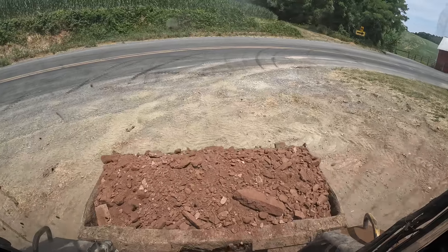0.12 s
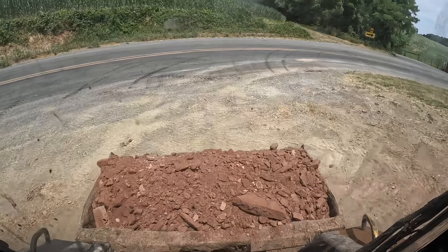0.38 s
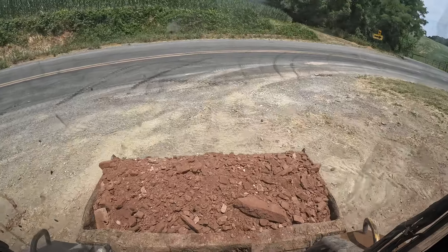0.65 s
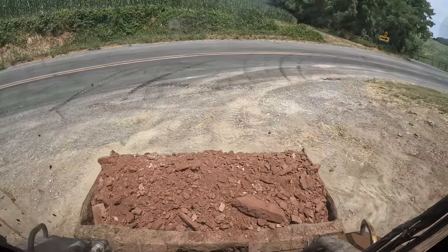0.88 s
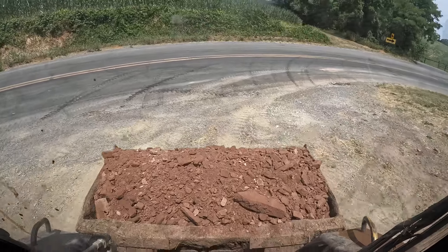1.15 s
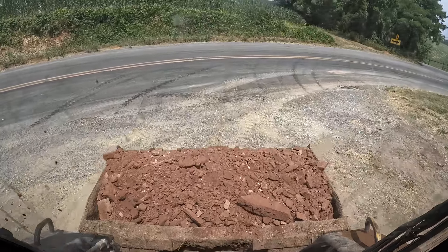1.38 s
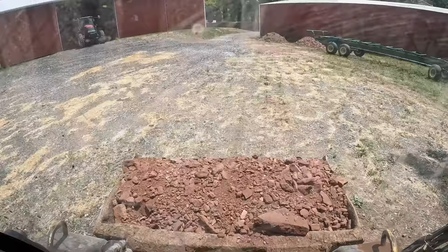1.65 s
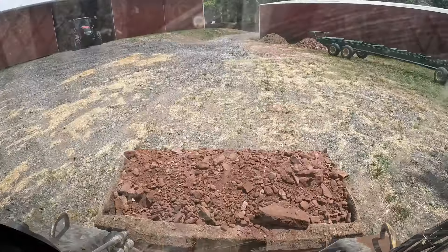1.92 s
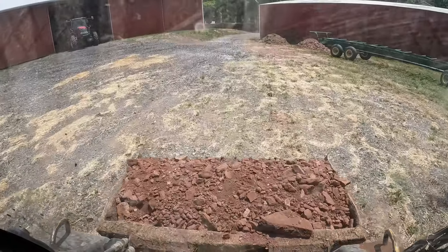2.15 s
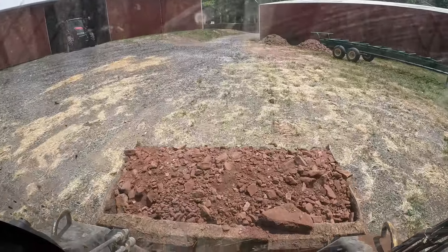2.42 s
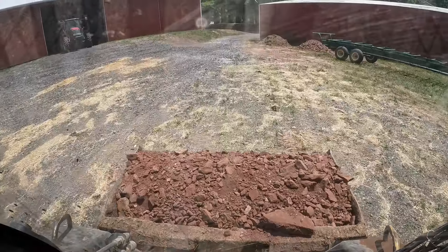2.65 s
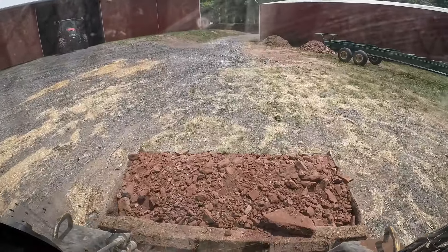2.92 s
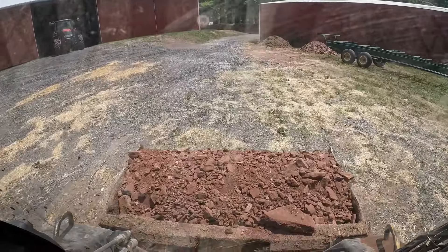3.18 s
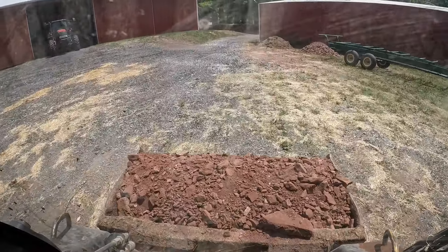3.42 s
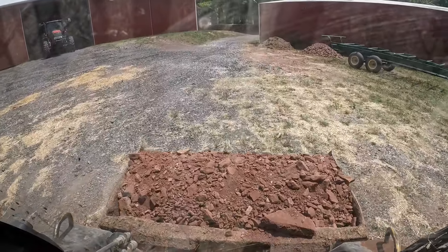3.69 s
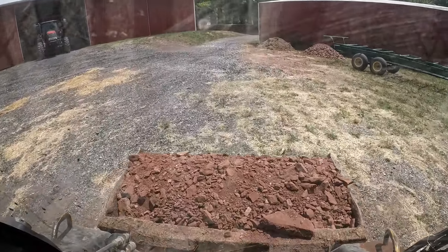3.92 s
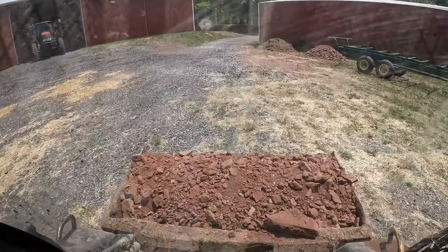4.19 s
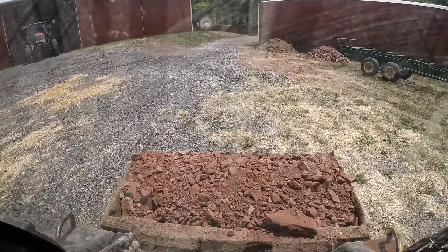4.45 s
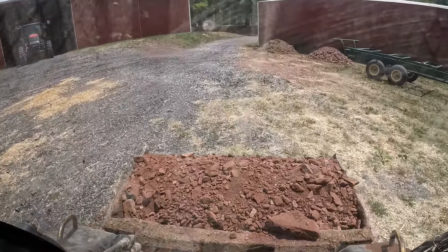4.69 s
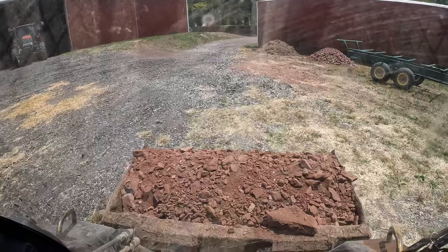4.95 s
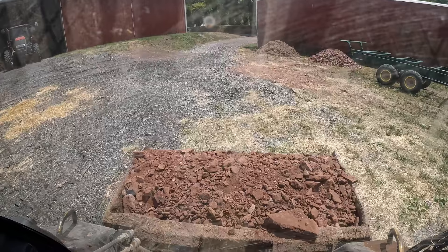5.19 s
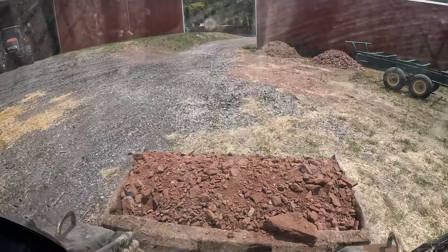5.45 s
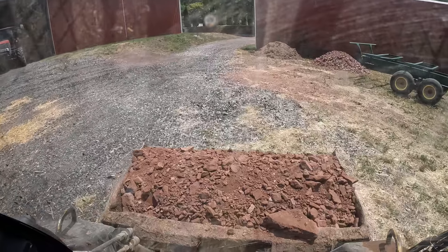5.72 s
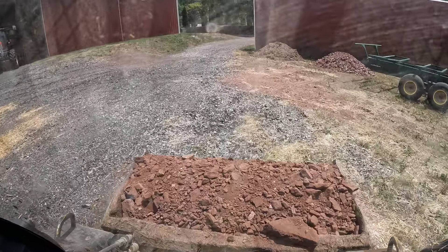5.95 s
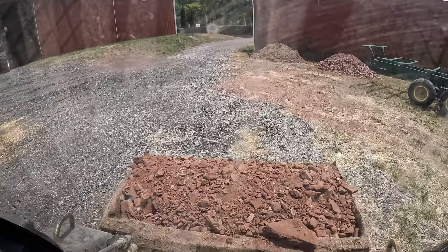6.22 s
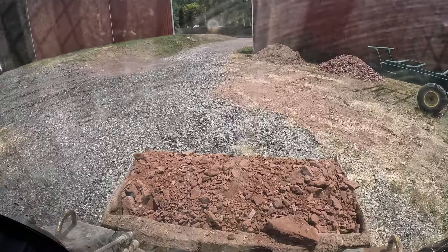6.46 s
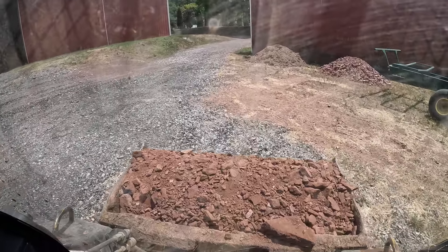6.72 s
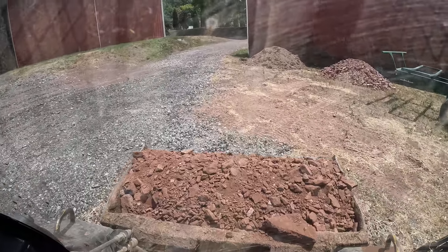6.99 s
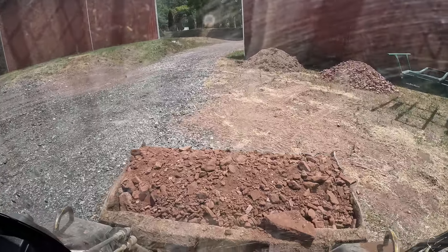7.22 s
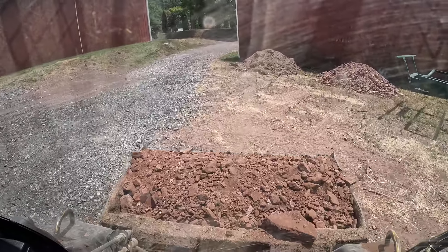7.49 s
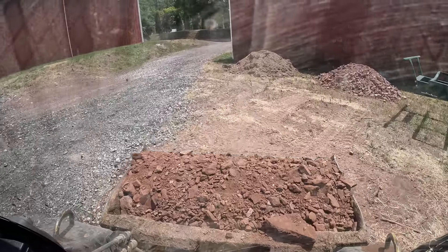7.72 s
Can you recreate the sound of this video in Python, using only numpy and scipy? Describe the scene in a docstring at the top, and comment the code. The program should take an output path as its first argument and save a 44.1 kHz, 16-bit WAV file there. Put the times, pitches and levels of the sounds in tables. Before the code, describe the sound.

Inside a small loader's closed cab, a booming diesel and whining pump drone as loose steel rattles, with one abrupt cut to brief silence.

```python
"""A booming diesel note and a whining pump fill the closed cab of a small loader crossing a yard with stone.
The microphone sits inside with the driver: panels roar, the frame groans, loose steel rattles over bumps.
Engine and pump are sine orders of one shaft; the rest is noise shaped by resonances, steady or in bursts.
A stereo passage is cut dead with a bright click; after a short silence a mono passage fades in."""
import sys
import numpy as np
from scipy import signal
from scipy.fft import rfft, irfft, next_fast_len
from scipy.io import wavfile
from scipy.ndimage import uniform_filter1d, map_coordinates

SR = 44100
rng = np.random.default_rng(int(sys.argv[2]) if len(sys.argv) > 2 else 0)


def amplitude_ratio(level_db):
    """Convert a level in decibels to the matching linear amplitude (field) ratio."""
    exponent = np.asarray(level_db, float) / 20
    return 10 ** exponent


def materialize(psi):
    """Save the field psi as 16-bit PCM at rate SR to the path in sys.argv[1].

    A 1-D psi becomes a single channel; in a 2-D psi each row is a channel.
    """
    bounded = np.clip(np.atleast_2d(psi).T, -1, 1)
    quanta = np.round(bounded * 32767).astype(np.int16)
    wavfile.write(sys.argv[1], SR, quanta)


N = 346626  # samples
CUT_S = 1.528  # the first passage ends


def unit(x):
    """Scale to rms 1."""
    return x / np.sqrt(np.mean(x ** 2) + 1e-20)


def along(points, hz):
    """Read (Hz, value) points on a log frequency axis."""
    f, v = np.transpose(points)
    return np.interp(np.log(hz + 1), np.log(f + 1), v)


def curves(rows):
    """One value per sample for each column after the time."""
    s, *cols = np.transpose(rows)
    return np.array([np.interp(np.arange(N) / SR, s, c) for c in cols])


def wobble(rate):
    """A smooth random curve with rate knots a second."""
    knots = rng.standard_normal(int(N * rate / SR) + 4)
    return map_coordinates(knots, [np.arange(N) * rate / SR])


def filtered(x, response):
    """Multiply the spectrum of x by a response of frequency."""
    m = 2 * next_fast_len(x.shape[-1] // 2 + 4096)
    return irfft(rfft(x, m) * response(np.fft.rfftfreq(m, 1 / SR)), m)[..., :x.shape[-1]]


def peaks(modes, hz, extra_db=0):
    """Gain of resonances standing on a flat background."""
    centre, width, db = np.transpose(modes)[..., None]
    bells = amplitude_ratio(db + extra_db) ** 2 / (1 + (2 * (hz - centre) / width) ** 2)
    return np.sqrt(1 + np.sum(bells, axis=0))


def causal(gain):
    """The same gain, in minimum phase so that all ringing follows the blow."""
    cepstrum = irfft(np.log(gain + 1e-6))
    half = len(cepstrum) // 2
    cepstrum[1:half] *= 2
    cepstrum[half + 1:] = 0
    return np.exp(rfft(cepstrum))


# spectrum of the ride rumble: freq_hz, density_db (relative, per Hz)
RUMBLE_SPECTRUM = [(7.1, -44), (12, -14), (16, -7), (22, -2), (43, -6.5), (51, -7.5), (58, -11.5),
                   (75, -28.5), (130, -120)]


def ride_rumble():
    """Low noise of the machine riding over the ground."""
    return unit(filtered(rng.standard_normal(N), lambda hz: amplitude_ratio(along(RUMBLE_SPECTRUM, hz))))


# spectrum of the panel roar: freq_hz, density_db (relative, per Hz)
ROAR_SPECTRUM = [(47, -28.5), (80, -9.5), (119, -13.5), (200, -12.5), (262, -16), (290, -22.5), (330, -19),
                 (420, -22.5), (600, -26), (780, -55), (1320, -120)]
# resonances of cab panels and air: freq_hz, width_hz, level_db (over the noise around them)
CAB_MODES = [(165, 25, 1.5), (230.7, 17, 12), (371, 31, 6.5), (504, 14, 5.5), (700, 57, -4.5),
             (800, 33, 0.5), (916, 80, 0)]


def panel_roar(shake):
    """Shaken noise rings the resonances of the cab's panels and air."""
    noise = rng.standard_normal(N) * shake
    return unit(filtered(noise, lambda hz: amplitude_ratio(along(ROAR_SPECTRUM, hz)) * peaks(CAB_MODES, hz)))


# spectrum of the engine bay drone: freq_hz, density_db (relative, per Hz)
DRONE_SPECTRUM = [(330, -21.5), (560, -7.5), (630, -4.5), (684, -5), (908, -7.5), (1800, -27.5),
                  (2340, -51), (3960, -120)]


def bay_drone(shake):
    """Engine bay noise, shaken like the panels, reaches the ear through the same cab resonances."""
    noise = rng.standard_normal(N) * shake
    return unit(filtered(noise, lambda hz: amplitude_ratio(along(DRONE_SPECTRUM, hz)) * peaks(CAB_MODES, hz)))


# spectrum of valves and injectors: freq_hz, density_db (relative, per Hz)
CLATTER_SPECTRUM = [(760, -31.5), (1300, -2.5), (1490, -1.5), (1610, -9), (1980, -9), (3120, -10.5),
                    (4660, -24), (6610, -28.5), (10600, -39.5), (13500, -53.5), (15200, -77)]
# resonances of loose steel, each use shifts the levels: freq_hz, width_hz, level_db (over the noise)
STEEL_MODES = [(1250, 170, -3), (1900, 45, 1), (2105, 35, 3), (2415, 35, 2), (2750, 40, 1), (2880, 40, 2),
               (3060, 40, 0), (3370, 40, 2), (3580, 45, 2), (3880, 50, 0), (4300, 50, 2), (5850, 120, 3),
               (6860, 70, -3), (7780, 60, 3), (10500, 200, 3), (12460, 60, 5)]


def valve_clatter(kick, jolt):
    """Uneven valve and injector noise, pulsed by the firing, faintly rings the steel."""
    uneven_db = .3 * kick + 1.3 * jolt + 1.3 * wobble(16) + 1.2 * wobble(120)
    ticks = rng.standard_normal(N) * amplitude_ratio(uneven_db)
    return unit(filtered(ticks, lambda hz: amplitude_ratio(along(CLATTER_SPECTRUM, hz)) * peaks(STEEL_MODES, hz, -7)))


# levels of the ride, rumble wobbling about its own: time_s, rumble_db, roar_db, clatter_db (rms)
RIDE_LEVELS = [(0.0, -24.5, -19.5, -41.5), (0.3, -20, -20, -41), (0.85, -31, -21, -40.5),
               (1.1, -22, -22.5, -42.5), (1.53, -26, -18.5, -43.5), (1.6, -27, -24, -49),
               (2.4, -26, -25, -47), (2.7, -30, -22, -50), (3.3, -24, -19.5, -45.5), (3.9, -23, -20, -45),
               (4.44, -24.5, -20, -48.5), (4.75, -27, -20, -47), (5.3, -21, -19.5, -44.5),
               (5.8, -26, -19, -45), (6.6, -24.5, -20, -48), (7.0, -23, -19.5, -49),
               (7.4, -24, -19.5, -46.5), (7.86, -23.5, -17.5, -46.5)]


def body(turns):
    """Ride rumble, panels and engine bay kicked by every firing, and valve and injector clatter."""
    rumble_db, roar_db, clatter_db = curves(RIDE_LEVELS)
    rumble_db = rumble_db + 2.7 * wobble(4.5)  # uneven ground
    in_first = np.arange(N) < CUT_S * SR
    drone_db = roar_db + np.where(in_first, -7.5, -11)  # drone under the roar in each passage
    kick = np.cos(2 * np.pi * turns)
    jolt = wobble(45)
    shake = amplitude_ratio(0.6 * kick + 0.61 * jolt)
    out = amplitude_ratio(rumble_db) * ride_rumble() + amplitude_ratio(roar_db) * panel_roar(shake)
    return out + amplitude_ratio(drone_db) * bay_drone(shake) + amplitude_ratio(clatter_db) * valve_clatter(kick, jolt)


# frame groans after bumps: centre_s, level_db (rms before the swell), freq_hz, width_hz, half_length_s
FRAME_GROANS = [(.27, -20.5, 103, 37, 0.11), (0.956, -38, 1390, 400, 0.018), (2.0, -33, 493, 55, 0.042),
                (2.68, -31, 790, 95, 0.2), (3.152, -33.5, 769.7, 110, 0.17), (3.38, -34, 780, 110, .12),
                (3.62, -30, 800, 120, 0.058), (4.566, -29, 1140, 800, 0.031), (5.38, -34, 830, 59.5, 0.067),
                (5.897, -32, 756.8, 218, 0.081)]


def groans():
    """A bump loads the frame: a band of noise swells and dies around one of its resonances."""
    out = np.zeros(N + SR)
    t = np.arange(SR // 2) / SR - .25
    for s, db, hz, width, half in FRAME_GROANS:
        noise = rng.standard_normal(len(t))
        band = filtered(noise, lambda f: 1 / (1 + (2 * (f - hz) / width) ** 2))
        swell_db = -14 * (t / half) ** 2
        out[round(s * SR):][:len(t)] += amplitude_ratio(db + swell_db) * unit(band)
    return out[SR // 4:][:N]


def burst_swell(t, length):
    """Level in dB of a burst that swells to its peak and dies away."""
    rise_share = .42  # of the length
    return np.where(t < 0, -8 * (t / rise_share / length) ** 2, -7 * t / (1 - rise_share) / length)


def clank_blow(t, hold):
    """Level in dB of a sharp blow: quick attack, slight sag over the hold, steep fade."""
    attack_share, sag_db, fade_db_per_s = .3, 3, 900  # attack as a share of the hold
    attack = -8 * (t / attack_share / hold) ** 2
    fall = -sag_db * np.minimum(t / hold, 1) - fade_db_per_s * np.maximum(t - hold, 0)
    return np.where(t < 0, attack, fall)


def faint_rattles():
    """Chance rattles, three a second, in rows like those of the listed bursts."""
    count = int(3 * N / SR)
    # level_db, bright_db, length_s, ring_hz
    mean, spread = (-49, -22, .022, 2900), (2.5, 4, .006, 500)
    scatter = np.clip(rng.standard_normal((count, 4)), -2, 2)
    return np.c_[rng.random(count) * N / SR, mean + spread * scatter]


# swelling bursts: mostly rattles of loose steel; at 1.525 s a brief bright click where the first
# passage is cut; at 2.68, 5.508, 5.891 and 5.904 s flashes of trim buzz while the pump whines:
# peak_s, level_db (rms of the ringing noise before the swell),
# bright_db (each 2 dB tilts 1 dB an octave; -12 is neutral), length_s, ring_hz (loudest ring)
SWELLING_BURSTS = [(0.089, -36, -18, 0.058, 5400), (0.106, -36, -11.5, .022, 6640),
                   (0.161, -25.5, -21.5, 0.019, 7000), (0.249, -44, 2, 0.014, 7460),
                   (0.397, -37, -14.5, 0.029, 3520), (0.442, -36.5, -16, 0.03, 3660),
                   (0.481, -37.5, -14.5, 0.028, 2750), (0.566, -48, -10.5, .008, 6000),
                   (0.592, -34, -13.5, .027, 3190), (0.694, -36.5, -15.5, 0.062, 2810),
                   (0.768, -25.5, -23.5, 0.014, 3570), (0.82, -34, -16, .017, 4600),
                   (0.869, -39, -16, 0.019, 3640), (0.905, -35.5, -20, 0.028, 2580),
                   (1.12, -37, -18, 0.02, 2567), (1.151, -31.5, -21, .04, 4070),
                   (1.2, -33, -19, 0.039, 5700), (1.241, -36, -15, .014, 3900),
                   (1.258, -35, -11, 0.02, 2680), (1.302, -40, -11.5, 0.034, 5940),
                   (1.421, -52, -1, .06, 3280), (1.525, -26.5, -2, 0.0063, 4300),
                   (1.829, -38, -16, 0.027, 2170), (2.104, -33, -18.5, 0.035, 3610),
                   (2.142, -38.5, -11.5, 0.048, 2840), (2.202, -35.5, -26, .034, 4590),
                   (2.306, -46.5, -9.5, 0.016, 2385), (2.42, -44, -18, .025, 2820),
                   (2.465, -39, -16, 0.023, 2105), (2.508, -39, -20.5, 0.034, 5630),
                   (2.592, -40.5, -18.5, 0.029, 3340), (2.68, -41.5, -18.5, 0.13, 3380),
                   (2.968, -48, -11.5, 0.026, 2160), (3.233, -38, -19.5, 0.04, 3870),
                   (3.509, -34.5, -13.5, 0.035, 2800), (3.637, -34, -17.5, 0.03, 2350),
                   (3.69, -30, -25.5, 0.042, 2510), (3.986, -45, -21.5, 0.035, 3080),
                   (4.021, -42, -21, 0.035, 2518), (4.07, -33, -20, 0.046, 4150),
                   (4.155, -34.5, -22.5, 0.03, 3580), (4.32, -40.5, -20.5, 0.033, 2940),
                   (4.53, -32, -23.5, 0.11, 3270), (4.554, -39, -12, .012, 3500),
                   (4.565, -26, -9.5, .02, 7780), (4.569, -43.5, 1, .03, 12460),
                   (4.596, -32.5, -19, 0.024, 2850), (4.603, -38, -13.5, 0.01, 10700),
                   (4.76, -45.5, -12, 0.026, 4200), (4.931, -37, -16, .025, 4600),
                   (5.066, -33.5, -19.5, 0.053, 2000), (5.161, -37.5, -28, .019, 2594),
                   (5.218, -32.5, -27, 0.045, 3360), (5.221, -41, -32.5, 0.034, 2230),
                   (5.46, -34, -23, 0.014, 3430), (5.502, -36, -21, 0.052, 3120),
                   (5.508, -44, -11, 0.021, 5850), (5.745, -30, -20.5, 0.041, 2332),
                   (5.765, -34.5, -14, 0.02, 2070), (5.871, -38, -22, 0.021, 3330),
                   (5.891, -46.5, -14.5, .04, 6620), (5.904, -49.5, -6.5, 0.027, 7600),
                   (5.913, -36.5, -23.5, 0.05, 3360), (6.051, -31.5, -18.5, .019, 2940),
                   (6.128, -35.5, -18, 0.013, 2710), (6.168, -35.5, -24, 0.021, 3460),
                   (6.325, -40, -18, 0.024, 2900), (6.495, -44, -8, .014, 2400),
                   (6.527, -39, -17, 0.025, 3300), (6.582, -41, -19, 0.022, 3300),
                   (7.069, -46, -30, .035, 3400), (7.313, -42, -22, 0.02, 4000),
                   (7.468, -41, -11, 0.041, 2990), (7.524, -34, -21.5, 0.023, 3000),
                   (7.782, -36, -15, 0.022, 2800), (7.836, -42, -22, .014, 2700)]
# blows of steel on steel: attack_end_s, level_db, bright_db, hold_s, ring_hz (levels as for the bursts)
STEEL_CLANKS = [(0.318, -38.5, -9, 0.0088, 3020), (0.333, -27, -8, 0.005, 3100),
                (0.339, -27.5, -8.5, 0.006, 5920), (0.42, -30, -11, .007, 2840),
                (0.939, -44, -13, 0.0056, 2680), (0.952, -25.5, -10, .013, 3886),
                (1.043, -37, -12, 0.012, 3508), (1.077, -29.5, -22.5, .008, 3540),
                (2.071, -33, -19, .022, 3220), (3.163, -36.5, -12, 0.021, 3100),
                (3.213, -35.5, -16, 0.0071, 2900), (3.609, -30, -14.5, 0.017, 3100),
                (4.569, -24, -14, 0.012, 2600), (5.039, -31, -22, 0.012, 2260)]
# spectrum of a burst before its brightness tilt: freq_hz, density_db (relative, per Hz)
BURST_SPECTRUM = [(410, -27.5), (700, -0.5), (1350, -8.5), (1680, -12), (2850, -10.5), (4530, -14.5),
                  (5870, -20.5), (6760, -20), (7790, -24.5), (12900, -38.5), (15200, -53)]


def rattles_clanks_and_flashes():
    """Rattles, clanks, buzz flashes and the cut's click: rough noise bursts through random steel mode strengths."""
    size, lead = 8192, 2048  # samples: whole burst, part before the peak
    out = np.zeros(N + size + lead)
    t = (np.arange(size) - lead) / SR
    bursts = [(row, burst_swell) for row in list(SWELLING_BURSTS) + list(faint_rattles())]
    bursts += [(row, clank_blow) for row in STEEL_CLANKS]
    for (s, db, bright_db, length, ring_hz), shape in bursts:
        rough_db = 2.8 * np.repeat(rng.standard_normal(size // 48 + 1), 48)[:size]
        rough = rng.standard_normal(size) * amplitude_ratio(rough_db)
        strengths_db = rng.normal(-.5, 4, (len(STEEL_MODES), 1))

        def colour(hz):
            octaves = np.log2(np.minimum(hz, 9000) / 3000 + 0.039)
            slope_db = along(BURST_SPECTRUM, hz) + .5 * (bright_db + 12.0) * octaves
            loudest = peaks([(ring_hz, 260, 7.5)], hz)
            return causal(amplitude_ratio(slope_db) * peaks(STEEL_MODES, hz, strengths_db) * loudest)

        shaped = amplitude_ratio(shape(t, length)) * rough
        steady, ring = filtered(np.array([rough, shaped]), colour)
        out[round(s * SR):][:size] += amplitude_ratio(db) * ring / np.std(steady)
    return out[lead:][:N]


# resonances of trim shaken by the pump: freq_hz, width_hz, level_db (over the noise)
TRIM_MODES = [(3370, 45, 25), (3600, 60, 18), (2850, 350, 16), (5850, 150, 7), (6600, 100, 8),
              (7620, 90, 9)]


def buzz(whine_db):
    """Loose trim chatters with the pump whine, fading faster than the whine does."""
    chatter = rng.standard_normal(N) * amplitude_ratio(4.5 * wobble(12))

    def response(hz):
        treble_cut = 1 + (hz / 6000) ** 4
        bass_cut = 1 + (2000 / (hz + 1)) ** 6
        return peaks(TRIM_MODES, hz) / treble_cut / bass_cut

    return amplitude_ratio(-53 + 1.3 * (whine_db + 25)) * unit(filtered(chatter, response))


# load drags the engine down and raises the pump's whine:
# time_s, firing_hz (before flywheel smoothing), whine_db (before floor, trim and wobble)
ENGINE_LOAD = [(0.0, 67.4, -19.5), (0.12, 68.7, -22.5), (0.3, 70.7, -27), (0.48, 71.2, -30),
               (0.7, 72.12, -35), (1.0, 73.06, -32.5), (1.12, 72.8, -46), (1.52, 72.78, -37),
               (2.52, 71.94, -44), (2.6, 71.4, -31.5), (2.74, 68.47, -26.5), (2.9, 68.17, -22.5),
               (3.1, 69.22, -28.5), (3.4, 68.4, -22.5), (3.6, 69.1, -26), (3.72, 70.4, -31.5),
               (3.97, 71.23, -37.5), (4.08, 69.42, -31), (4.42, 70.78, -33), (4.6, 69, -27.5),
               (4.8, 69.95, -37), (5.02, 70.26, -34.5), (5.18, 68.54, -23.5), (5.4, 68.4, -24.5),
               (5.55, 69.75, -33.5), (5.74, 69.98, -33.5), (5.9, 68.3, -21), (6.03, 68.36, -27),
               (6.2, 70.33, -36), (6.4, 70.93, -34), (6.8, 69.73, -32), (7.15, 71.03, -36),
               (7.4, 69.37, -29.5), (7.5, 68.4, -36), (7.62, 68.3, -29.5), (7.86, 67.94, -24.5)]
# firing note, before its wobble: time_s, level_db (rms)
NOTE_LEVEL = [(0, -16.5), (0.4, -16.5), (0.9, -14.5), (1.52, -16), (1.9, -20.5), (2.4, -19), (3.0, -17),
              (4.0, -16), (5.3, -16.5), (6.3, -16), (7.3, -16.5), (7.55, -19.5), (7.86, -15.5)]
# pump fundamental, before its wobble: time_s, level_db (rms)
PUMP_LEVEL = [(0, -40.5), (0.5, -40), (1.52, -45.5), (2.2, -46.5), (2.7, -37.5), (3.5, -35.5), (3.9, -39.5),
              (4.3, -35), (4.9, -30.5), (5.2, -34), (5.6, -37.5), (6.0, -30.5), (6.45, -33.5),
              (6.75, -29.5), (7.2, -28.5), (7.4, -25.5), (7.5, -22.5), (7.86, -24.5)]
# other shaft orders; 6.5 and 13 are a 13-tooth gear pump, 3.67 and 4.75 belt-driven parts:
# multiple (of the firing rate), level_db (against the firing note, before wobble)
SHAFT_ORDERS = [(.5, -21), (1.25, -22), (1.75, -25), (2, -23), (2.5, -23), (3, -19), (3.67, -17), (4, -25),
                (4.75, -23), (5, -30), (6.5, -26), (7.24, -30), (8, -32), (10, -29), (11, -32), (13, -29.5)]


def engine():
    """Firing note and orders, and the nine-piston pump on the same shaft; also the turn count of the firing."""
    (firing_hz, whine_db), (note_db,), (pump_db,) = curves(ENGINE_LOAD), curves(NOTE_LEVEL), curves(PUMP_LEVEL)
    firing_hz = uniform_filter1d(firing_hz, size=SR // 16)  # the flywheel rounds every change
    whine_db = np.maximum(whine_db, -41)  # the whine's floor
    note_db = note_db + 1.37 * wobble(9)
    turns = np.cumsum(firing_hz) / SR
    flutter = wobble(25)  # the shaft never turns quite evenly

    def tone(k, db):
        phase = k * turns + rng.random() + 0.0065 * k * flutter
        return np.sqrt(2) * amplitude_ratio(db) * np.sin(2 * np.pi * phase)

    note = tone(1, note_db + 0.14 * wobble(26))
    orders = sum(tone(k, note_db + db + 2.0 * wobble(5)) for k, db in SHAFT_ORDERS)
    # two firings a shaft turn: the pump beats at pistons / 2 times the firing rate
    pistons = 9
    pump = tone(pistons / 2, pump_db + 1.1 * wobble(8))
    # the whine is the pump's second harmonic
    pump += tone(pistons, whine_db - 1.5 + 2.2 * wobble(12)) * (1 + .2 * wobble(70))
    pump += tone(3 * pistons / 2, whine_db - 23 + 1.7 * wobble(15))
    pump += tone(2 * pistons, 1.5 * (pump_db + 20.0) - 39.5 + 2.2 * wobble(16))
    pump += tone(4 * pistons, note_db - 48 + 4 * wobble(7))  # a thin strand comes and goes
    return note + orders + pump + buzz(whine_db), turns


# scattered sound between the ports, before a further 0.5 dB cut: freq_hz, side_db (against mid)
SIDE_WIDTH = [(60, -52.5), (130, -36.5), (290, -21.5), (640, -13.5), (1390, -4), (3060, -3.5), (6730, -3),
              (14800, -4)]
# balance of the ports: freq_hz, left_over_right_db
PORT_TILT = [(200, 0), (500, -1), (2400, -2), (4400, -1), (12000, -2)]


def scene():
    """The two microphone ports differ by scattered reflections off the cab's walls, mostly in the treble."""
    tones, turns = engine()
    mid = body(turns) + groans() + rattles_clanks_and_flashes() + tones
    z = signal.stft(mid, nperseg=512)[2]
    random_phase = np.exp(2j * np.pi * rng.random(z.shape))
    scattered = signal.istft(z * random_phase, nperseg=512)[1][:N]
    side = filtered(scattered, lambda hz: amplitude_ratio(along(SIDE_WIDTH, hz) - 0.5))
    lean = filtered(mid, lambda hz: amplitude_ratio(along(PORT_TILT, hz) / 2) - 1)
    return np.array([mid + side + lean, mid - side - lean])


def roll_off(x):
    """The treble ends steeply here."""
    return signal.sosfilt(signal.butter(12, 15370, fs=SR, output="sos"), x)


def record(dry):
    """Gain control evens out the surges and the input stage rounds the peaks.
    The first passage stops within a few ms; the second is mono and fades in."""
    power = np.abs(uniform_filter1d(np.mean(dry ** 2, axis=0), size=2600))
    usual = np.abs(uniform_filter1d(power, size=22000))
    evened = dry * (usual / (power + 1e-9)) ** 0.21
    top = .9  # full swing of the input stage
    rounded = evened / (1 + np.abs(evened / top) ** 4) ** (1 / 4)
    t = np.arange(N) / SR
    first = np.clip((CUT_S - t) / .004, 0, 1)
    fade_start_s, fade_s, fade_power = 1.615, .25, 1.9
    second = np.clip((t - fade_start_s) / fade_s, 0, 1) ** fade_power
    mix = rounded * first + rounded.mean(axis=0) * second
    return roll_off(mix)


dry = scene()
out = record(dry)
materialize(out)
```